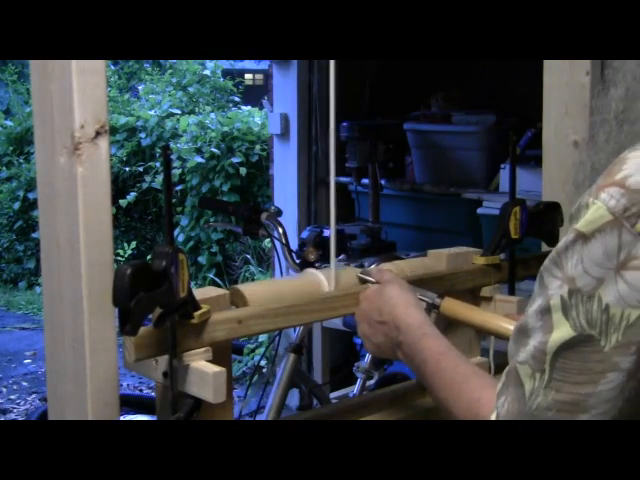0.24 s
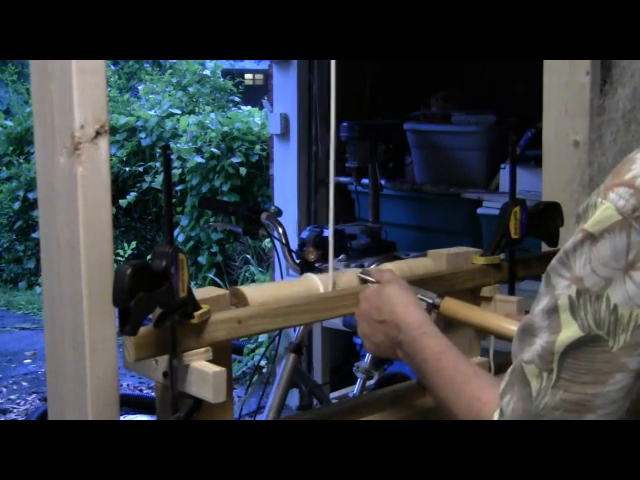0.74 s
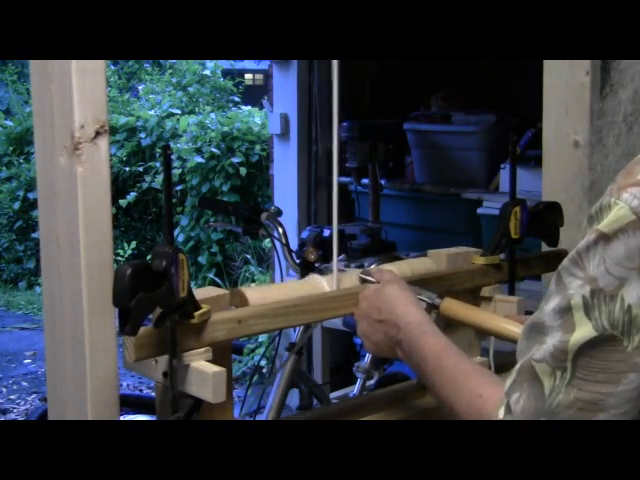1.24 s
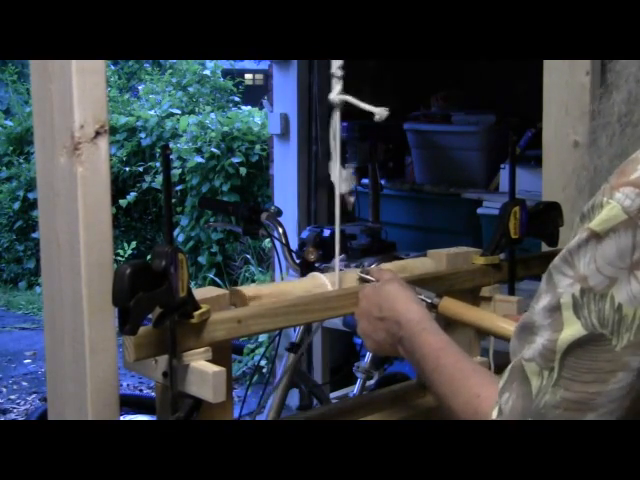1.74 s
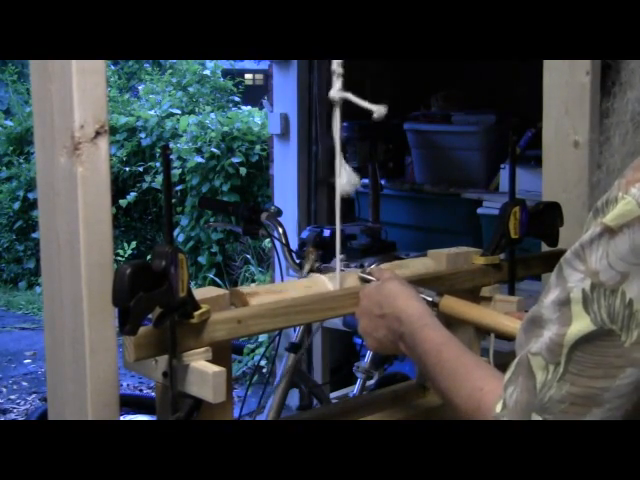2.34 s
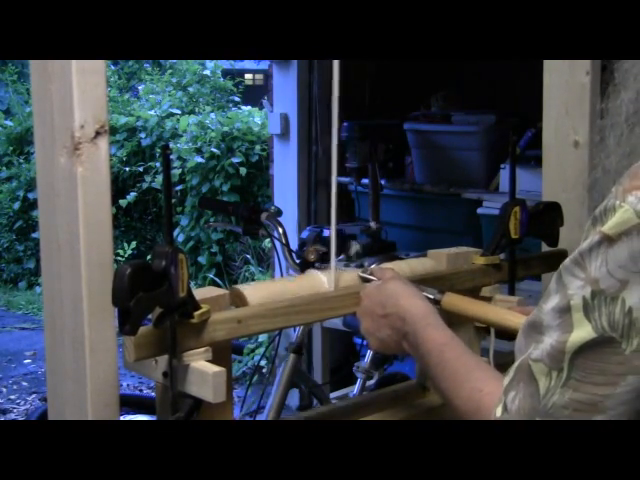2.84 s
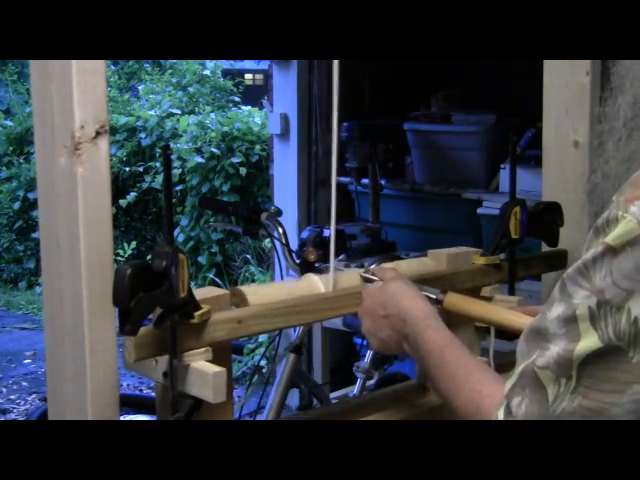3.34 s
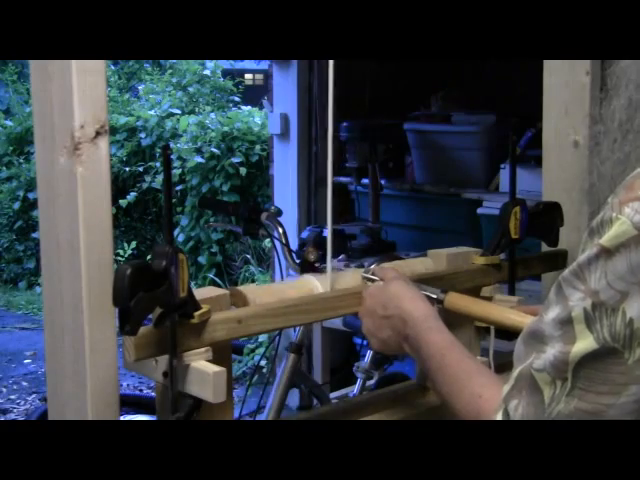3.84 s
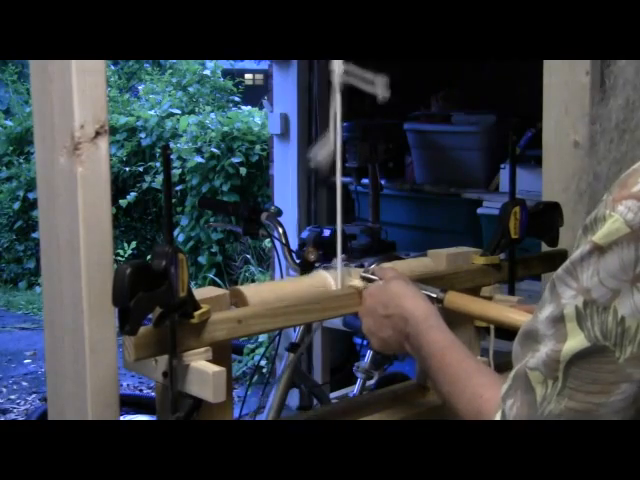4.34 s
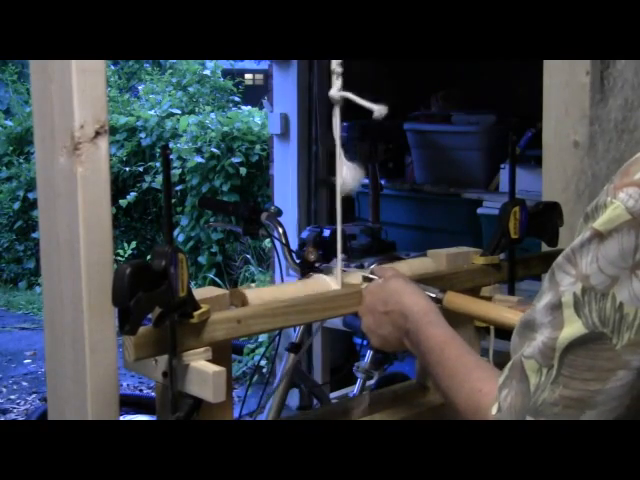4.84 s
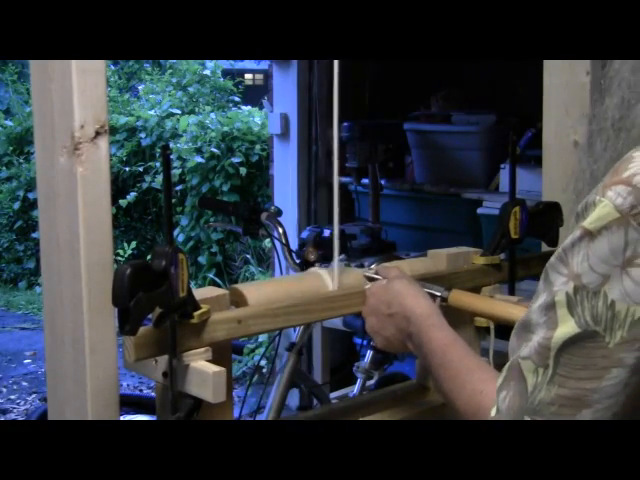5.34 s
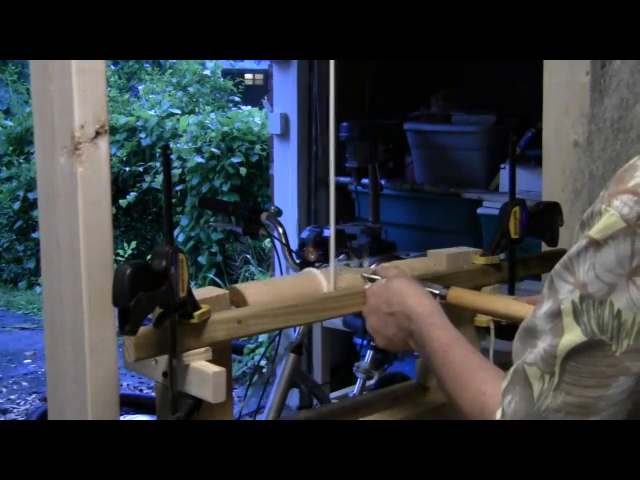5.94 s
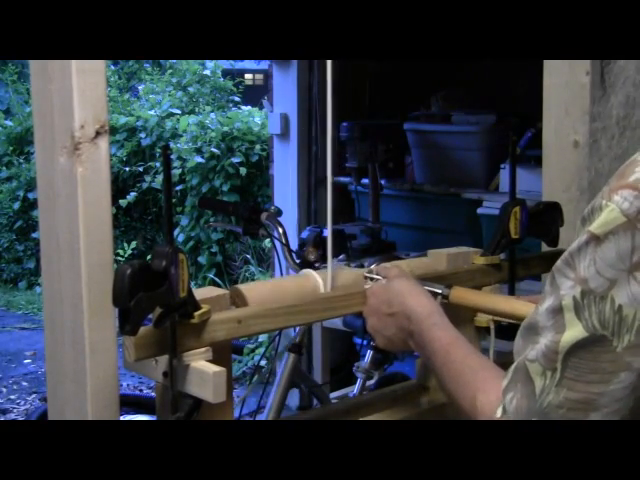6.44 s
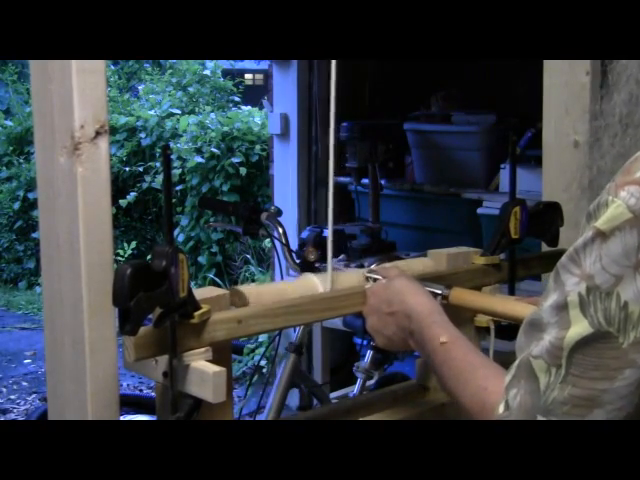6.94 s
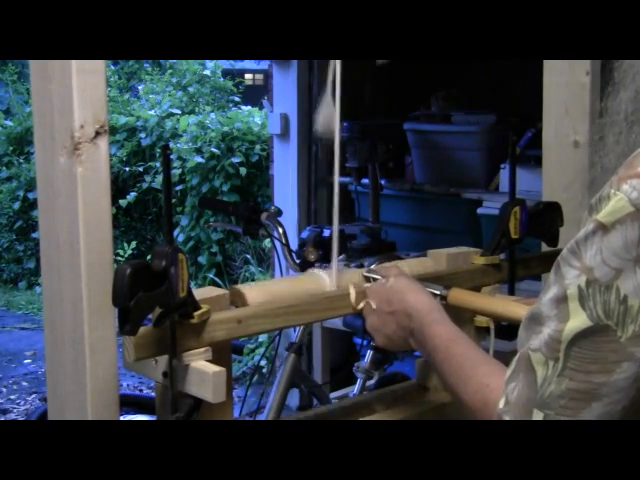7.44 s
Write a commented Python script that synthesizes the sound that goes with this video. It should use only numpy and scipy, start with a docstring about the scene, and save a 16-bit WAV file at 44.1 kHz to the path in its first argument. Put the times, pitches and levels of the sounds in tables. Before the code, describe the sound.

Close, dry rasps of a gouge biting into turning wood come in a regular rhythm, often in quick pairs or clusters. The first cuts are more splintery, and heavier ones end in a dull wooden shudder. Small chip ticks and a faint cord hiss fill the gaps. A nearby shed adds a short echo, while a far engine hums and grows a little under quiet yard air.

```python
"""A gouge cuts a spindle on a cord-driven pole lathe, before an open shed; yard air and a far engine.
Each stroke: the cord hisses back, the edge grazes, then bites once or a few times. Fibres tear,
the growing shaving sings lower, steel and frame ring, and a heavy load ends in a dull judder.
Chips tick down before the next stroke. The first strokes take off a rough skin and splinter more;
the engine's hum swells in the second half."""
import sys
import numpy as np
from scipy import signal
from scipy.fft import rfft, irfft, next_fast_len
from scipy.io import wavfile

SR = 44100
rng = np.random.default_rng(int(sys.argv[2]) if len(sys.argv) > 2 else 0)


def transcribe(u):
    """Save the signal u as a 16-bit wav file named by the first command-line argument.

    u: samples, shape (n,) or (channels, n), limited to [-1, 1]; the rate is SR.
    q: integer samples, one column per channel.
    """
    v = np.clip(np.atleast_2d(u).T, -1, 1)
    q = np.round(v * 32767).astype(np.int16)
    wavfile.write(sys.argv[1], SR, q)


N = 339570
SPAN = 16384  # samples per bite or tick
T = np.arange(SPAN) / SR

# Outdoor air spectrum: freq_hz, gain_db
YARD_SPECTRUM = [(20, -41), (42, -49), (62, 0), (80, -8.5), (135, 3.5), (170, 0), (200, -2.5), (300, -1.5),
                 (430, -9.5), (900, -11.5), (1500, -12.5), (3000, -24), (9000, -33), (13000, -51)]
# Outdoor air, side against mid: freq_hz, gain_db
YARD_SIDE = [(60, -17), (110, -16), (200, -16.5), (360, -5.5), (1200, -5), (2200, -5.5), (9000, -7)]
# Engine speed: time_s, turns_per_s
ENGINE_SPEED = [(0, 19.9), (3.3, 21.25), (4.6, 20.7), (5.4, 21.15), (7.7, 21.33)]
# Low, middle and high engine orders: time_s, level_db
HUM_LOW = [(0, -49.5), (1.6, -59), (2.7, -57.5), (3.3, -50.5), (4.6, -45), (5.4, -45.5), (6.1, -60),
           (6.6, -44.5), (7.7, -56)]
HUM_MIDDLE = [(0, -54.5), (4.1, -64), (4.65, -47.5), (5.35, -49), (5.9, -57), (6.6, -41.5), (6.92, -41),
              (7.12, -50.5), (7.7, -48)]
HUM_HIGH = [(0, -70), (6.4, -60.5), (6.9, -47.5), (7.7, -51.5)]
# Shed decay: freq_hz, t60_s
SHED_DECAY = [(100, 0.62), (500, 0.36), (1400, 0.33), (3700, 0.39), (10000, 0.29)]
# Shed reverberation, side against mid: freq_hz, gain_db
SHED_SIDE = [(60, -32), (250, -22), (1000, -19), (2500, -18.5), (5000, -14), (9000, -12.5), (12000, -1.5)]
# Spectra of cord hiss and rubbing centres: freq_hz, gain_db
CORD_SPECTRUM = [(300, -22), (1500, -17), (3500, 11.5), (5500, 2), (9300, 4.5), (11000, -1), (12800, -54)]
RUB_SPECTRUM = [(80, -20), (250, -6.5), (520, 6), (950, 5), (1400, -11.5), (2300, -9), (4000, -29),
                (10000, -30)]
# Spectra of a tick's snap and knock: freq_hz, gain_db
SNAP_SPECTRUM = [(200, 13.5), (1500, -5.5), (3500, 9), (6500, -0.5), (9500, 0.5), (12500, -39)]
KNOCK_SPECTRUM = [(100, -20), (500, 0), (1000, 6), (2200, 9.5), (3500, 3.5), (8000, -60)]
# Ticks of chips and cord: start_s, level_db, dullness_db
CHIP_TICKS = [(0.1815, -40.5, 0), (0.4877, -27.5, -2), (0.7356, -28.5, 0), (0.8563, -31, 1),
              (1.333, -35, 5.5), (2.0137, -34, 3.5), (2.5543, -33.5, 1), (2.6016, -31, 0),
              (2.6435, -33.5, 0), (2.6661, -31, 2.5), (3.2081, -32.5, 3), (3.272, -30.5, 1.5),
              (3.9037, -28, 1), (3.928, -30, 1), (4.5147, -29, -1), (4.546, -32, -1), (5.0817, -33, 4),
              (5.1272, -32.5, -3), (5.1507, -35, 4), (5.5289, -26.5, -0.5), (5.7829, -26.5, 0),
              (6.2104, -28.5, 0), (6.4268, -30, 0.5), (6.9428, -23.5, 4.5), (7.0071, -31.5, -2),
              (7.0309, -30.5, 2), (7.1622, -42, 15.5), (7.5682, -33, 2.5), (7.6294, -31.5, 1.5)]
# Spectra of juddering bed and legs, fine splinters, tearing fibres: freq_hz, gain_db
JUDDER_SPECTRUM = [(45, -36), (65, -20), (100, -0.5), (150, 1), (270, 7), (400, -10), (600, -0.5),
                   (1200, -49), (4000, -70)]
SPLINTER_SPECTRUM = [(1500, -17), (5500, 3), (7200, 1.5), (9000, 6), (10500, 0.5), (11300, -36),
                     (12300, -28)]
TEAR_SPECTRUM = [(100, -30.5), (800, 5), (2000, 1.5), (2900, 3), (3700, 4.5), (4500, -5), (5500, 0),
                 (6300, -6), (7100, 4), (7800, -8.5), (9300, -13), (10300, -12), (11300, -16),
                 (12800, -26.5)]
# Modes of wooden frame and steel gouge: freq_hz, width_hz, energy_db
FRAME_MODES = [(165, 21, -41), (310, 47, 4), (413, 40, 1.5), (524, 21, -4), (544.3, 32, 10),
               (687.3, 11, 7.5), (759, 3.7, 2), (946, 7.6, 7), (1018, 8.1, 5.5), (1040.5, 24, 11),
               (1095, 30, -8.5), (1267, 38, -3.5), (1450, 28, -27), (1610, 73, 5.5), (1710, 54, 5),
               (1900, 130, -4)]
STEEL_MODES = [(2245, 49, 1), (2325, 91, 7), (2526, 33, -7.5), (2590, 86, -6.5), (3680, 200, -13.5)]
# Treadle strokes, relative levels: touch_s, graze_db, cord_return_db
TREADLE_STROKES = [(.32, -77, -74), (0.945, -38.5, -62), (1.6, -78, -76), (2.24, -43, -67),
                   (2.841, -44.5, -81), (3.48, -68, -72), (4.105, -45, -83), (4.738, -37.5, -77),
                   (5.41, -62, -64), (5.887, -42, -62.5), (6.623, -35.5, -61), (7.226, -40, -57),
                   (7.85, -50, -57)]
# Gouge bites, relative levels: start_s, length_s, tear_db, shaving_db, settle_hz, steel_db, frame_db
GOUGE_BITES = [ (0.111, 0.016, -46.5, -45, 834, -51, -35.5), (.384, .014, -23, -25.5, 930, -24.5, -26),
               (.461, 0.016, -28.5, -26, 870, -23, -26.5), (1.033, 0.018, -25.5, -25, 950, -20, -22.5),
               (1.112, 0.021, -29.5, -25, 890, -25.5, -26.5), (1.139, 0.033, -35, -27.5, 654, -36, -27.5),
               (1.666, 0.027, -24, -18.5, 840, -18.5, -29.5), (1.737, 0.01, -25, -22, 770, -27, -28.5),
               (2.127, 0.0091, -68, -35, 1050, -44, -40), (2.166, 0.029, -51, -39.5, 834, -50, -40.5),
               (2.313, 0.026, -22.5, -39, 2240, -20.5, -29.5), (2.369, 0.044, -29, -31, 754, -29.5, -30),
               (2.908, 0.015, -27, -40, 2030, -17, -26.5), (2.922, 0.037, -24, -14.5, 1033, -24.5, -32.5),
               (2.985, 0.015, -29, -25, 970, -25.5, -23.5), (3.542, 0.03, -27.5, -37, 1070, -35.5, -39),
               (3.599, 0.048, -31.5, -29, 740, -40, -35), (4.163, 0.035, -22, -26, 1540, -19, -33.5),
               (4.224, 0.033, -29, -31.5, 840, -40, -30), (4.793, 0.027, -22.5, -17, 1156, -22.5, -30),
               (4.812, 0.021, -24.5, -20.5, 1660, -30, -29), (4.827, 0.03, -27, -24.5, 1010, -45, -49),
               (4.871, 0.058, -35.5, -36.5, 940, -36, -31.5), (5.48, 0.01, -40.5, -42, 1490, -46, -48),
               (5.517, 0.019, -47, -35, 900, -40, -49), (5.705, 0.03, -53, -38.5, 656, -51, -41.5),
               (5.915, 0.017, -68, -30, 700, -48, -37), (5.978, 0.037, -35, -46, 1010, -39, -29),
               (6.01, 0.036, -32, -23.5, 670, -31.5, -29), (6.068, 0.047, -24, -18, 790, -26, -24),
               (6.088, 0.02, -45, -19, 1700, -26, -38), (6.687, 0.04, -26, -33, 860, -28, -27.5),
               (6.754, 0.029, -32, -29, 800, -36, -29), (7.279, .012, -27, -30, 5140, -43, -44),
               (7.287, 0.013, -28, -27.5, 3390, -51, -43), (7.3, .027, -28, -21, 1680, -21.5, -29),
               (7.343, 0.053, -32, -37, 1200, -35, -34.5)]
# Stereo balance: freq_hz, left_minus_right_db
BALANCE = [(50, 0.5), (150, 1.74), (1100, 1.8), (2200, 1.5), (4500, 0.8), (9000, -1), (12000, -4)]

SKIM_S = 0.005  # edge skims before digging in


def amp(db):
    """Decibels to gain."""
    return 10 ** (np.asarray(db) / 20)


def unit_rms(x):
    """Scale to rms 1."""
    return x / np.sqrt(np.mean(x ** 2) + 1e-20)


def unit_burst(x, length_s):
    """Scale to the energy of rms 1 held for length_s."""
    return x / np.sqrt(np.sum(x ** 2) / (length_s * SR) + 1e-20)


def at_hz(points, hz):
    """Interpolate on a log-frequency axis."""
    knots_hz, values = np.transpose(points)
    return np.interp(np.log(hz + 1), np.log(knots_hz + 1), values)


def follow(curve):
    """Interpolate (time_s, value) at every sample."""
    return np.interp(np.arange(N) / SR, *np.transpose(curve))


def add(mix, start_s, sound):
    """Mix in at start_s."""
    part = mix[max(round(start_s * SR), 0):][:len(sound)]
    part += sound[:len(part)]


def shaped(x, spectrum):
    """Zero-phase filter."""
    size = next_fast_len(len(x))
    gain = amp(at_hz(spectrum, np.fft.rfftfreq(size, 1 / SR)))
    return irfft(rfft(x, size) * gain, size)[:len(x)]


def causal(spectrum, size=2048):
    """Causal impulse response of a spectrum."""
    log_gain = np.log(amp(at_hz(spectrum, abs(np.fft.fftfreq(size, 1 / SR)))))
    return np.fft.ifft(np.exp(np.conj(signal.hilbert(log_gain)))).real[:size // 2]


def ringing(modes):
    """Impulse response of damped modes."""
    return sum(amp(db) * np.sqrt(width_hz) * np.exp(-np.pi * width_hz * T) * np.sin(2 * np.pi * hz * T)
               for hz, width_hz, db in modes)


def through(x, response):
    """Convolve, keeping the length."""
    return signal.fftconvolve(x, response)[:len(x)]


def resonate(x, hz, width_hz):
    """Resonance gliding along hz."""
    phasor = np.exp(2j * np.pi * np.cumsum(hz) / SR)
    pole = np.exp(-np.pi * width_hz / SR)
    return 2 * (phasor * signal.lfilter([1 - pole], [1, -pole], x / phasor + 1e-18)).real


def drift(rate_hz, size):
    """Random wander, rms about 1."""
    knots = rng.standard_normal(4096)
    return np.interp(np.arange(size) * rate_hz / SR, np.arange(len(knots)), knots)


def noise(spectrum, size=N):
    """Coloured noise, rms 1."""
    return unit_rms(shaped(rng.standard_normal(size), spectrum))


def impulses(per_s, size):
    """Sparse random clicks."""
    return rng.standard_normal(size) * (rng.random(size) < per_s / SR)


def yard(level_db=-46):
    """Steady wash of outdoor air."""
    return amp(level_db) * noise(YARD_SPECTRUM)


def engine(waver=0.0043, weak_db=-9):
    """Five orders of a far engine swell and fade on their way."""
    low_db, middle_db, high_db = follow(HUM_LOW), follow(HUM_MIDDLE), follow(HUM_HIGH)
    turns = np.cumsum(follow(ENGINE_SPEED) * (1 + waver * drift(12, N))) / SR
    order_db = {5: low_db, 11: middle_db, 16: high_db, 13: middle_db + weak_db, 18: high_db + weak_db}
    return sum(np.sqrt(2) * amp(db + drift(6.2, N)) * np.sin(2 * np.pi * order * turns)
               for order, db in order_db.items())


def reflections(first_s=0.00303, build_s=0.012, early_db=2, early_s=0.0072):
    """Close echoes off bench and posts, then the shed's tail, decaying per band."""
    taps = rng.choice([-1., 1.], SR) * (rng.random(SR) < .12)
    hz, time_s, bands = signal.stft(taps, SR, nperseg=256)
    decay = amp(-60 * time_s / at_hz(SHED_DECAY, hz)[:, None])
    tail = signal.istft(bands * decay, SR, nperseg=256)[1]
    age_s = np.maximum(np.arange(len(tail)) / SR - first_s, 0)
    tail *= (age_s > 0) * (1 - np.exp(-age_s / build_s) + amp(early_db) * np.exp(-age_s / early_s))
    return tail / np.linalg.norm(tail)


def shed(x, fades_per_s=11, tails=3):
    """Shed reverberation: echo tails cross-fade for a smooth room without fixed ringing."""
    fades = fades_per_s * np.arange(N) / SR
    echoes = sum(through(x * np.cos(np.pi * (fades + k / tails)), reflections()) for k in range(tails))
    return np.sqrt(2 / tails) * echoes


def cord_level_db(idle_db=-62.5, lead_s=0.21, rise_s=0.18, fall_s=0.12):
    """The pole whips the cord back; the spindle slows before the edge touches."""
    gain = amp(idle_db)
    for touch_s, _, return_db in TREADLE_STROKES:
        from_crest_s = np.arange(N) / SR - (touch_s - lead_s)
        width_s = np.where(from_crest_s < 0, rise_s, fall_s)
        swell = np.exp(-np.minimum((from_crest_s / width_s) ** 2, 20))
        gain = np.hypot(gain, amp(return_db) * swell)
    return 20 * np.log10(gain)


def spindle(hiss_db=-2, rub_db=-26, rub_follow=0.39, dust_per_s=14, dust_db=-12):
    """Cord hisses round the spindle, centres rub, dust patters."""
    cord_db = cord_level_db()
    uneven = amp(1.2 * drift(60, N))
    hiss = amp(hiss_db) * noise(CORD_SPECTRUM) * uneven
    dust = amp(dust_db) * unit_rms(through(impulses(dust_per_s, N), causal(SNAP_SPECTRUM)))
    rub = amp(rub_db) * noise(RUB_SPECTRUM) * uneven
    return (hiss + dust) * amp(cord_db) + rub * amp(rub_follow * cord_db)


def fibres(per_s=7000, clump_db=2.0, clumps_per_s=450):
    """Fibres snap in clumps set by the grain."""
    return impulses(per_s, SPAN) * amp(clump_db * drift(clumps_per_s, SPAN))


def ticks(snap_db=-8.0, knock_db=-11, flick_db=-11.5, start_hz=8000, settle_hz=2400, fall_s=0.0079):
    """Chips and cord tick: tiny snaps, a splinter's falling flick, a dull knock."""
    out = np.zeros(N)
    snap_ir, knock_ir = causal(SNAP_SPECTRUM), causal(KNOCK_SPECTRUM)
    burst = np.exp(-T / 0.0032)
    flick_hz = settle_hz + (start_hz - settle_hz) * np.exp(-T / fall_s)
    for start_s, level_db, dull_db in CHIP_TICKS:
        snap = unit_burst(through(fibres() * burst, snap_ir), length_s=0.0083)
        flick = unit_burst(resonate(fibres() * T * burst ** 2, flick_hz, width_hz=2600), length_s=0.0025)
        knock = unit_burst(through(fibres() * burst, knock_ir), length_s=0.0078)
        tick = amp(snap_db - dull_db / 2) * snap + amp(flick_db) * flick + amp(knock_db + dull_db) * knock
        add(out, start_s, amp(level_db) * tick)
    return out


def judder(length_s, frame_db, heavy_db=-26, base_db=-38, db_per_db=1.13, half_width_s=0.018):
    """Bed and legs shudder just after a heavy load."""
    crest_s = SKIM_S + 1.57 * length_s
    swell = np.exp(-np.minimum(((T - crest_s) / half_width_s) ** 2, 20))
    return amp(base_db + db_per_db * (frame_db - heavy_db)) * swell * noise(JUDDER_SPECTRUM, SPAN)


def shaving(drive, progress, settle_hz, shake_db, start_ratio=1.78, flutter=0.016, skirt_db=-12):
    """A shaving sings lower as it grows; a shaking frame leaves it ragged and damped."""
    pitch_hz = settle_hz * (1 + (start_ratio - 1) * np.exp(-progress / 0.22))
    pitch_hz *= 1 + flutter * drift(313, SPAN)
    width_hz = 400 * amp(0.51 * (shake_db + 9))
    broad = resonate(drive, pitch_hz, width_hz)
    narrow = resonate(broad, pitch_hz, width_hz)
    return unit_rms(narrow) + amp(skirt_db) * unit_rms(broad)


def bite(row, skin_db, responses, entry_s=0.0036, skim=0.8, linger=0.028, steel_lag=0.28):
    """The edge skims, digs in, lifts a shaving and leaves; steel and frame ring."""
    length_s, tear_db, shaving_db, settle_hz, steel_db, frame_db = row
    tear_ir, splinter_ir, steel_ir, frame_ir = responses
    age_s = np.maximum(T - SKIM_S, 0)
    progress = age_s / length_s
    dig = skim * np.minimum(T / SKIM_S, 1) ** 2 + 1 - np.exp(-(age_s / entry_s) ** 2)
    contact = dig * (np.exp(-progress ** 3) + linger * np.exp(-progress / 2))
    load = progress ** 0.84 / (1 + progress ** 7)  # force builds with depth
    bend = contact * progress / (progress + steel_lag)  # steel rings once loaded
    snaps = fibres()
    song = shaving(snaps * load, progress, settle_hz, shake_db=frame_db - shaving_db)
    splinter_db = tear_db + skin_db - 6 + 0.29 * (frame_db - tear_db)  # more shake, more splinters
    parts = [(tear_db, through(snaps * contact, tear_ir)),
             (splinter_db, through(fibres() * contact, splinter_ir)),
             (shaving_db, song),
             (steel_db, through(fibres() * bend, steel_ir)),
             (frame_db, through(fibres() * load, frame_ir))]
    return sum(amp(db) * unit_burst(x, length_s) for db, x in parts)


def gouge(gain_db=-3.0, graze_s=0.026, graze_hz=930, rough_db=4.5, skin_s=1.26):
    """Light grazes, then bites; rough skin adds splinters and judder until cut away."""
    out = np.zeros(N)
    responses = (causal(TEAR_SPECTRUM), causal(SPLINTER_SPECTRUM),
                 ringing(STEEL_MODES), ringing(FRAME_MODES))
    grazes = [(touch_s, graze_s, db, db - 2.5, graze_hz, db + 2, db - 3.5)  # columns as GOUGE_BITES
              for touch_s, db, _ in TREADLE_STROKES]
    for start_s, *row in list(GOUGE_BITES) + grazes:
        skin_db = rough_db * np.exp(-(start_s / skin_s) ** 4)
        cut = amp(gain_db) * bite(row, skin_db, responses)
        shudder = amp(skin_db) * judder(length_s=row[0], frame_db=row[-1])
        add(out, start_s - SKIM_S, cut + shudder)
    return out


def scene(direct_db=-4.0):
    """Lathe centred; shed reverberation and yard around it."""
    low_cut = signal.butter(4, 55, "highpass", fs=SR, output="sos")  # cuts rumble below 55 Hz
    lathe = signal.sosfilt(low_cut, gouge() + spindle()) + ticks()
    # into the shed: freq_hz, gain_db
    send = shaped(lathe, [(100, -8), (500, 1), (1000, 0.5), (2300, -3.5), (4500, -5.0), (10000, -7.5)])
    mid = amp(direct_db) * lathe + shed(send) + yard() + engine()
    side = shaped(shed(lathe), SHED_SIDE) + shaped(yard(), YARD_SIDE)
    return np.array([mid + side, mid - side])


def record(dry):
    """Opposite left and right colouring, then a low-pass."""
    channels = np.array([shaped(x, [(hz, sign * db / 2) for hz, db in BALANCE])
                         for x, sign in zip(dry, (1, -1))])
    low_pass = signal.firwin(511, 12700, window=("kaiser", 9), fs=SR)
    return signal.oaconvolve(channels, low_pass[None], "same")


dry = scene()
out = record(dry)
transcribe(out)
```